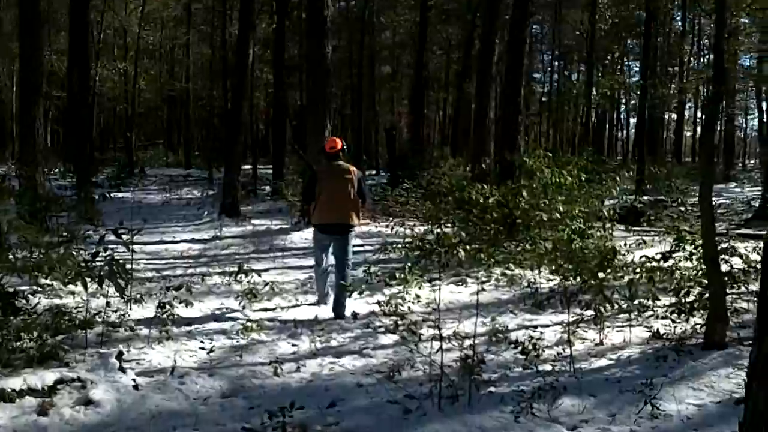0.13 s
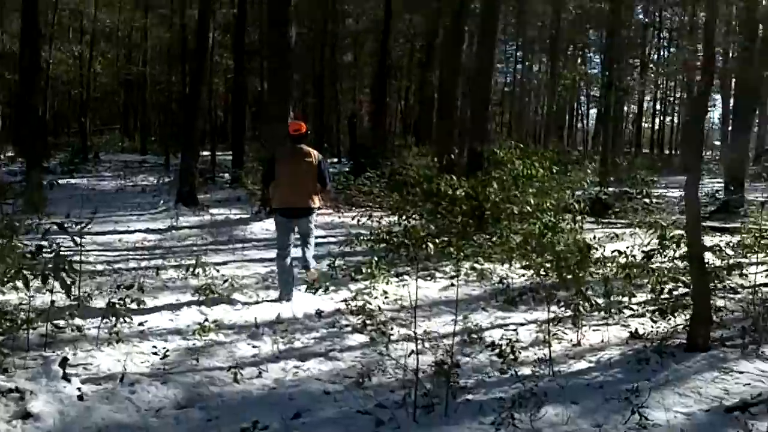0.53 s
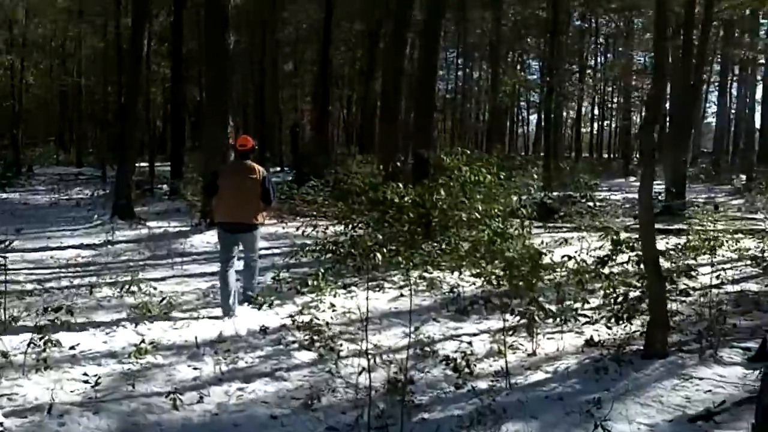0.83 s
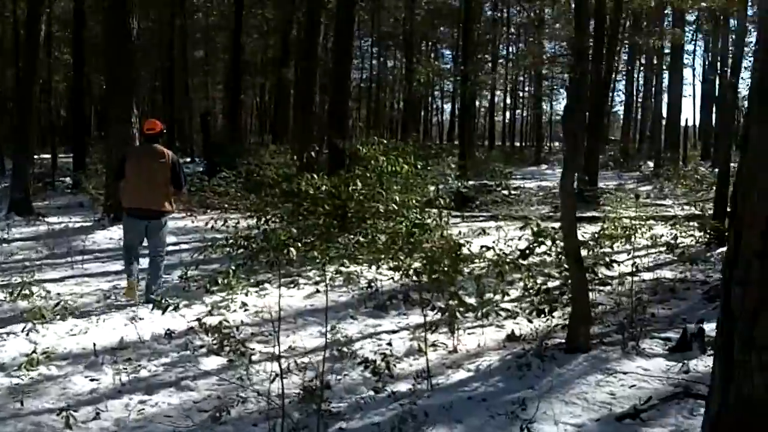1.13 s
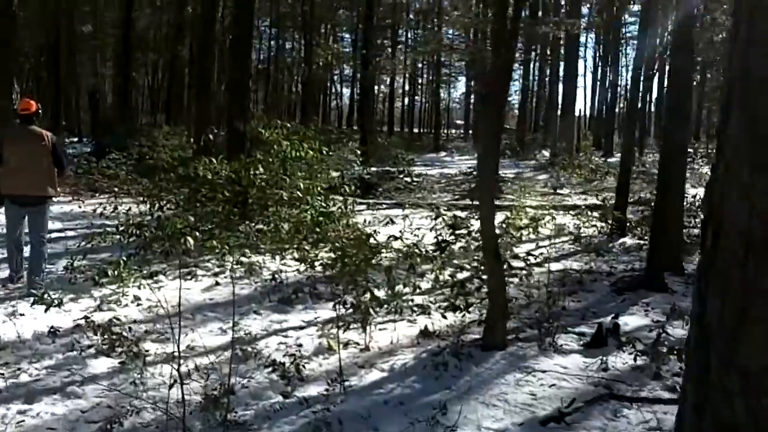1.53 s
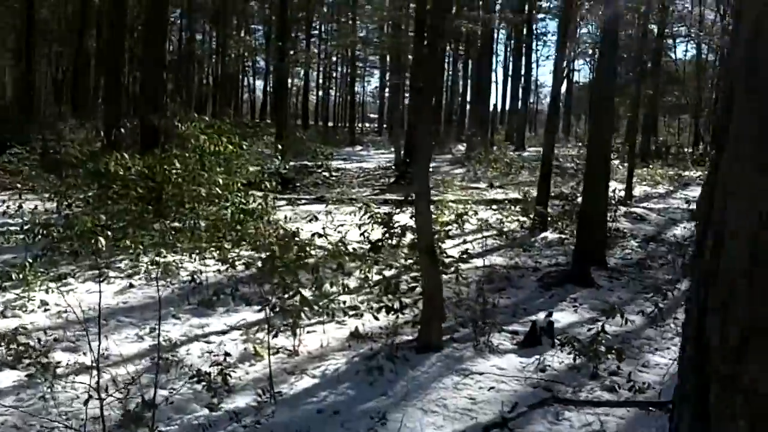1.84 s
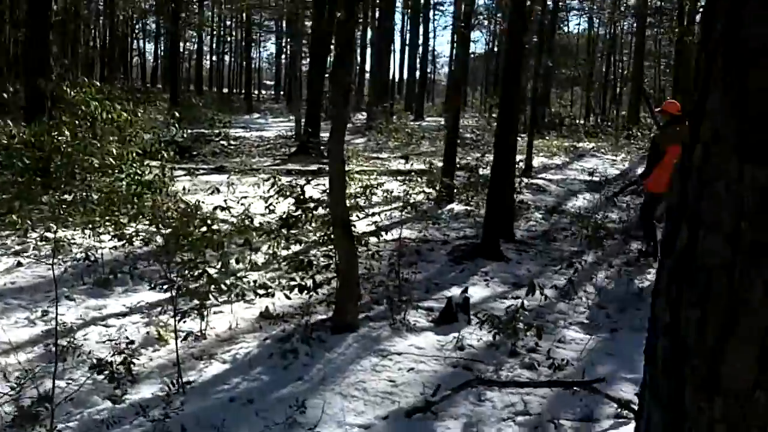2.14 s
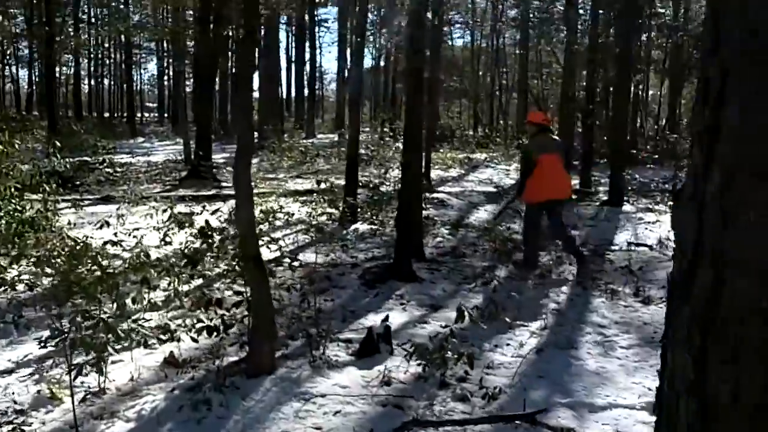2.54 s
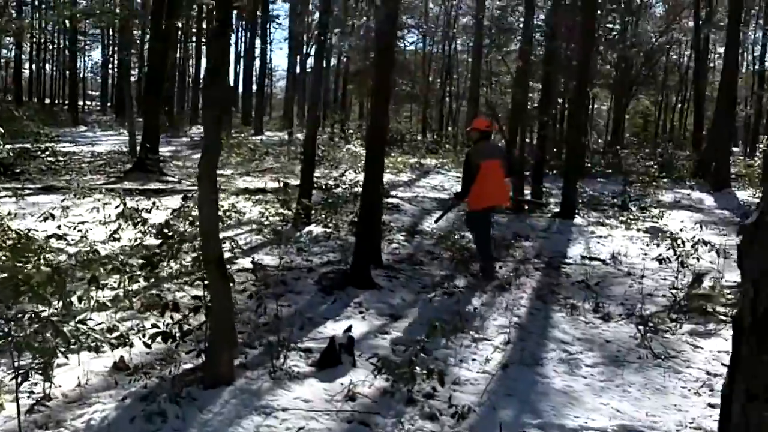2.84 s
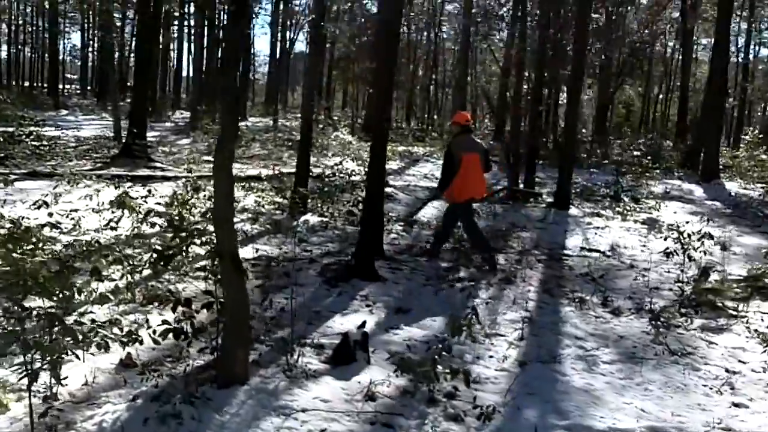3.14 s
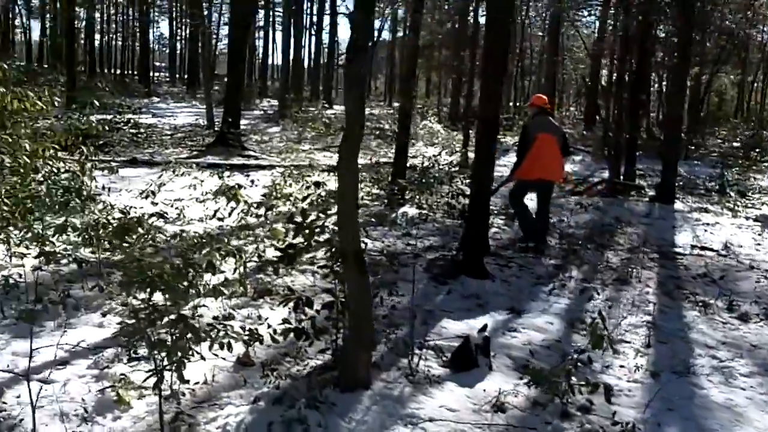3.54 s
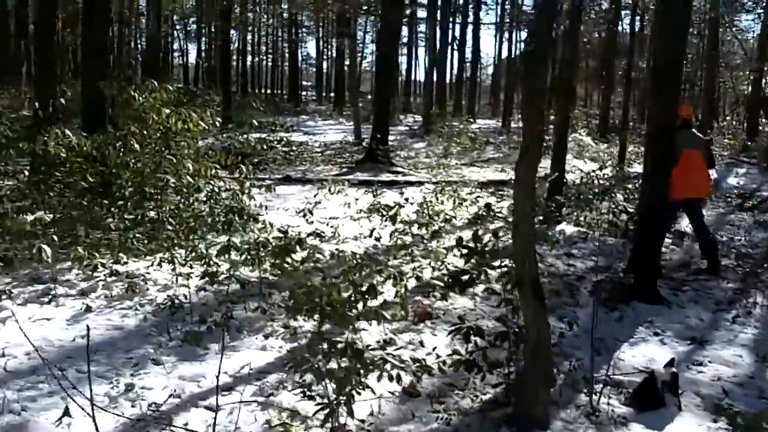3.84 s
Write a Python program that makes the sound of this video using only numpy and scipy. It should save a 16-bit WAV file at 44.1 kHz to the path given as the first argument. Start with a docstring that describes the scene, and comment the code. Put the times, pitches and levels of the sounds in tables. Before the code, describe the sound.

Footsteps crunch through crusted snow in a quiet pine wood, with a few sharp snaps.

```python
"""Footsteps in crusted snow

Two people walk through crusted snow in a pine wood: each step is a burst of many tiny ringing fractures. Damped
low resonances make dull boot knocks; twigs snap as short modal rings, and thin ice ticks. Shaped noise gives
the faint rustle of the wood and the rumble of light wind on the microphone, and a row of notches is cut into
the sound."""
import sys
import numpy as np
from scipy import signal
from scipy.fft import rfft, irfft
from scipy.io import wavfile

SR = 44100
rng = np.random.default_rng(int(sys.argv[2]) if len(sys.argv) > 2 else 0)


def digitize_waveform(pressure):
    """Quantize a signal to 16-bit integers and store it at the path in sys.argv[1].

    Rows of a 2-D input are taken as channels; values are limited to [-1, 1].
    """
    field = np.atleast_2d(pressure).T
    bounded = np.clip(field, -1, 1)
    quanta = np.round(bounded * 32767).astype(np.int16)
    wavfile.write(sys.argv[1], SR, quanta)


N = 176400
TIME = np.arange(N) / SR

# spectral weighting shared by the rustle of the wood and the loose crust: hz, relative_db
RUSTLE_COLOUR = [(40, -24), (100, 15), (200, 6.5), (500, 0.5), (1200, 1), (2200, -0.5), (4200, 4.5),
                 (6400, 1.5), (9800, -5), (15000, -12)]


def from_db(db):
    """Decibels to amplitude gain."""
    return 10 ** (np.asarray(db) / 20)


def rms_one(x):
    """Normalise to unit mean power."""
    return x / np.sqrt(np.mean(x ** 2) + 1e-20)


def drift(corner_hz):
    """Slow random fluctuation of rms 1: white noise through two equal low-pass poles."""
    pole = np.exp(-2 * np.pi * corner_hz / SR)
    noise = rng.standard_normal(N + SR)
    slow = signal.lfilter([1], [1, -2 * pole, pole * pole], noise)
    return rms_one(slow[SR:])  # the filter has settled after a second


def coloured(x, points):
    """Spectral weighting, interpolated in dB over log frequency; rms 1."""
    hz, db = np.transpose(points)
    bins = np.maximum(np.fft.rfftfreq(N, 1 / SR), 1)
    gain = from_db(np.interp(np.log(bins), np.log(hz), db))
    return rms_one(irfft(rfft(x) * gain, N))


def ring(clicks, hz, t60_s):
    """Damped resonator: a unit impulse excites a decaying sine of initial amplitude 1."""
    pole = np.exp(-np.log(1000) / (t60_s * SR))
    angle = 2 * np.pi * hz / SR
    return signal.lfilter([0, np.sin(angle)], [1, -2 * pole * np.cos(angle), pole * pole], clicks + 1e-18)


def click(s):
    """Unit impulse at one instant."""
    return 1. * (np.arange(N) == int(s * SR))


def grains(low_hz, high_hz, per_s, cycles, spread_db, colour):
    """Granular fracture: random impulses excite damped resonators, in clumps; rms 1."""
    clump_db, clump_corner_hz = 1.5953, 38.8
    count = 16  # resonator pitches, spaced evenly in log frequency
    sizes = from_db(spread_db * np.minimum(rng.exponential(1, N), 4)) * rng.choice([-1, 1], N)
    clicks = sizes * (rng.random(N) < per_s / SR)
    dealt = rng.integers(0, count, N)  # which resonator each grain excites
    rings = np.zeros(N)
    for k, hz in enumerate(np.geomspace(low_hz, high_hz, count)):
        rings += ring(clicks * (dealt == k), hz, cycles / hz) * np.sqrt(hz) * hz ** 0.324
    return rms_one(coloured(rings, colour) * from_db(clump_db * drift(clump_corner_hz)))


def pressure(s, attack_s, hold_s, release_s):
    """Load envelope: linear rise, plateau until hold_s after the onset, exponential relaxation."""
    age = TIME - s
    return np.clip(age / attack_s, 0, 1) * np.exp(-np.clip((age - hold_s) / release_s, 0, 20))


def snow():
    """Brittle fracture under load: uncorrelated crunches and cracks add in power and drive the grains."""
    # a boot sinks in, rolls or drags: start_s, length_s, packing_db, crust_db, fine_ice_db
    crunches = [(0.34, 0.0723, -54, -49.5, -57), (0.432, 0.041, -53.5, -50.5, -64),
                (0.501, 0.035, -61, -51, -70), (0.585, 0.08, -62, -55.5, -60),
                (0.904, 0.0937, -54, -44.5, -52.5), (1.015, 0.0562, -52.5, -46, -53),
                (1.107, 0.141, -66, -53, -53.5), (1.218, 0.0747, -58.5, -45, -59),
                (1.636, 0.0198, -61.5, -51.5, -57), (1.694, 0.05, -53.5, -43.5, -53),
                (1.753, 0.0298, -52.5, -44, -56), (1.815, 0.0612, -53.5, -52, -60.5),
                (1.924, 0.0143, -60, -50, -61), (2.194, 0.078, -67, -59, -59),
                (2.268, 0.0648, -55, -45.5, -55), (2.346, 0.1311, -57, -48.5, -54.5),
                (2.509, 0.0314, -55, -50.5, -64.5), (2.726, 0.03, -77.5, -63.5, -62),
                (2.94, 0.1502, -55.5, -47.5, -56), (3.121, 0.0535, -59, -52, -63),
                (3.196, 0.14, -72.5, -52.5, -61.5), (3.448, 0.0434, -61, -53, -79.5),
                (3.625, 0.14, -60, -49.5, -52.5), (3.768, 0.121, -56.5, -47.5, -54),
                (3.907, 0.11, -66, -56.5, -66)]
    crunch_attack_s, crunch_release_s = 0.0128, 0.02206
    # a plate of crust gives way at once: start_s, decay_s, packing_db, crust_db, fine_ice_db
    cracks = [(0.373, 0.017, -55.5, -46.5, -48.5), (0.4357, 0.012, -50.5, -42, -46),
              (0.8634, 0.0098, -48, -41.5, -54.5), (1.2884, 0.00273, -45.5, -36.5, -43.5),
              (1.365, 0.0197, -58, -52.5, -54), (1.6285, 0.0167, -57, -45.5, -51),
              (1.729, 0.0082, -63, -34.5, -62), (2.1, 0.0105, -57, -51.5, -76),
              (2.18, 0.0114, -55, -46, -60), (2.2697, 0.0071, -49, -42.5, -61),
              (2.313, 0.0026, -39, -54, -62), (2.465, 0.014, -52, -48, -65),
              (2.54, 0.0032, -50, -52.5, -65), (2.702, 0.00154, -39.5, -39.5, -46.5),
              (2.894, 0.0162, -46.5, -42, -51.5), (3.066, 0.0048, -47, -49, -67.5),
              (3.1217, 0.0071, -47, -41.5, -48.5), (3.16, 0.0113, -45.5, -44, -64),
              (3.253, 0.0109, -46, -44.5, -61.5), (3.478, 0.0127, -51, -57.5, -55.5),
              (3.528, 0.00167, -48.5, -38, -40.5), (3.5333, 0.009, -52, -45, -44),
              (3.583, 0.0105, -51.5, -48, -50), (3.6111, 0.0066, -46.5, -41.5, -45),
              (3.741, 0.0117, -47.5, -45, -64), (3.928, 0.00454, -54, -37.5, -49.5)]
    crack_attack_s = 0.000308
    packing_lag_s = 0.001256  # the snow under a broken plate gives way a moment later
    # packing snow, crust and fine ice: low_hz, high_hz, grains_per_s, t60_cycles, size_spread_db
    grain_kinds = [(263.3, 2578, 3800, 5.83, 3), (3444, 7020, 4200, 5.6, 2.5),
                   (8820, 17600, 12000, 2.55, 2.5)]
    # spectral weighting of packing snow: hz, relative_db
    packing_colour = [(60, -10), (150, -1), (400, 1.5), (750, -1), (1300, -1), (2200, 2), (3200, -6),
                      (6000, -37)]
    # spectral weighting of crust: hz, relative_db
    crust_colour = [(800, -25.5), (2400, -3), (3400, -0.5), (4700, -1.5), (6300, -2.5), (7500, -8.5),
                    (10000, -9)]
    # spectral weighting of fine ice: hz, relative_db
    fine_ice_colour = [(3000, 1.5), (8000, 11), (10000, 11), (12300, 0), (14000, 1.5), (15500, -1.5)]
    # larger lumps that collapse: low_hz, high_hz, lumps_per_s, t60_cycles, size_spread_db
    lump_grains = (183.4, 861.5, 350, 12.7, 2.79)
    lump_db = -6.5  # against the packing snow
    # loose bits of crust that settle: low_hz, high_hz, bits_per_s, t60_cycles, size_spread_db
    debris_grains = (730, 13000, 700, 3.43, 3.37)
    debris_db, settle_s = -8.5, 0.251  # level against the smoothed crust; time constant of its power

    power = np.zeros((3, N))  # packing snow, crust, fine ice
    for s, length_s, *db in crunches:
        load = pressure(s, crunch_attack_s, length_s, crunch_release_s)
        power += np.outer(from_db(db), load) ** 2
    # only the crunches crush lumps
    lumps = np.sqrt(power[0]) * from_db(lump_db) * grains(*lump_grains, packing_colour)

    for s, decay_s, *db in cracks:
        sudden = pressure(s, crack_attack_s, crack_attack_s, decay_s)
        delayed = pressure(s, packing_lag_s, packing_lag_s, decay_s)
        power += (from_db(db)[:, None] * [delayed, sudden, sudden]) ** 2
    colours = (packing_colour, crust_colour, fine_ice_colour)
    kinds = [grains(*kind, colour) for kind, colour in zip(grain_kinds, colours)]
    fractures = np.sum(np.sqrt(power) * kinds, axis=0)

    pole = np.exp(-1 / (settle_s * SR))
    loose = np.sqrt(signal.lfilter([1 - pole], [1, -pole], power[1]))
    debris = loose * from_db(debris_db) * grains(*debris_grains, RUSTLE_COLOUR)
    return fractures + lumps + debris


def heels():
    """Impact and stick-slip: each knock and three weaker jerks excite a heavily damped resonance."""
    # dull knocks, from heel on the ground to sole on the crust: start_s, level_db, pitch_hz
    thuds = [(.374, -34.5, 349), (0.867, -33.5, 119.4), (.911, -50, 450), (1.036, -35, 330),
             (1.070, -35, 790), (1.289, -50, 740), (1.456, -47.5, 490), (1.852, -37.5, 595),
             (1.869, -43.5, 340), (2.295, -41.5, 135.5), (2.314, -34.5, 118), (2.429, -44, 420),
             (2.464, -40, 363), (2.7021, -42, 753), (2.893, -39.5, 300), (3.048, -36, 509),
             (3.253, -37.5, 599), (3.478, -41.5, 482), (3.741, -34.5, 140), (3.782, -35.5, 350)]
    t60_cycles, soft_hz = 3.84, 1200
    slip_s, slip_db = 0.013057, -3  # longest delay of a jerk; its level against the knock
    out = np.zeros(N)
    for s, db, hz in thuds:
        slips = sum(rng.choice([-1, 1]) * click(s + slip_s * late) for late in rng.random(size=3))
        blows = click(s) + from_db(slip_db) * slips
        out += from_db(db) * ring(blows, hz, t60_cycles / hz)
    return signal.sosfilt(signal.butter(1, soft_hz, fs=SR, output="sos"), out)


def twigs():
    """Modal excitation: fibres part in quick succession and ring the modes of the twig."""
    # twigs snap under the snow: start_s, level_db, pitch_hz
    snaps = [(1.2878, -31, 4714), (1.687, -47.5, 4594), (2.0277, -44.5, 3990), (2.809, -45.5, 3930),
             (3.973, -49, 4460)]
    # fibres part in turn: delay_s, relative_db
    splinters = [(0, 8), (.00043, -6.5), (.0013, 0)]
    # modes of a twig: pitch_ratio, relative_db, t60_s
    modes = [(0.95, -9.5, 0.004), (0.993, 3, 0.005), (0.294, -14.5, 0.00265), (2.16, -23, 0.002)]
    out = np.zeros(N)
    for s, db, hz in snaps:
        breaks = sum(from_db(db + fibre_db) * click(s + delay_s) for delay_s, fibre_db in splinters)
        for ratio, mode_db, t60_s in modes:
            out += from_db(mode_db) * ring(breaks, hz * ratio, t60_s)
    return out


def ticks():
    """Impulse response of thin ice: a bare click with a very short, high ring."""
    # thin ice ticks: start_s, level_db
    ice_ticks = [(3.5277, -30.5), (3.5853, -32.5)]
    pitch_hz, t60_s = 13900, 0.00091
    clicks = sum(from_db(db) * click(s) for s, db in ice_ticks)
    return clicks + .5 * ring(clicks, pitch_hz, t60_s)


def air():
    """Broadband turbulence as shaped noise: a flickering rustle, and wind with Gaussian puffs."""
    # puffs of wind on the microphone: centre_s, half_length_s, level_db
    gusts = [(0.411, 0.052, -38), (1.186, 0.0545, -41), (3.667, 0.0122, -34.5)]
    # spectral weighting of the wind: hz, relative_db
    wind_colour = [(5, 1.5), (15, 4.5), (25, 1.5), (45, -4.5), (70, -11), (120, -22), (250, -37.5),
                   (1000, -80)]
    wind_db = -49  # between the puffs
    rustle_db, flicker_db, flicker_corner_hz = -57, 0.7764, 12.5
    rustle_level = from_db(rustle_db + flicker_db * drift(flicker_corner_hz))
    rustle = coloured(rng.standard_normal(N), RUSTLE_COLOUR) * rustle_level
    puffs = sum(from_db(db) * np.exp(-((TIME - s) / half_s) ** 2) for s, half_s, db in gusts)
    wind = coloured(rng.standard_normal(N), wind_colour) * (from_db(wind_db) + puffs)
    return rustle + wind


def scene():
    """Superposition of footsteps and air, in mono."""
    return (snow() + heels() + twigs() + ticks() + air())[None]


def record(dry):
    """Linear filtering: a row of notches is cut, silence precedes the onset, a low-pass cuts the top."""
    # notches cut into the sound: centre_hz, width_hz, depth_db
    notches = [(2701.2, 1028, -30), (5483, 777, -65.5), (7926, 2967, -47), (10935, 402, -38.5)]
    start_s, cutoff_hz = .349, 15300
    x = dry
    for hz, width_hz, depth_db in notches:
        # subtracting the resonant band leaves a notch
        band = signal.lfilter(*signal.iirpeak(hz, hz / width_hz, fs=SR), x)
        x = x - (1 - from_db(depth_db)) * band
    x = x * (TIME >= start_s)
    return signal.sosfilt(signal.ellip(10, .3, 70, cutoff_hz, fs=SR, output="sos"), x)


dry = scene()
out = record(dry)
digitize_waveform(out)
```